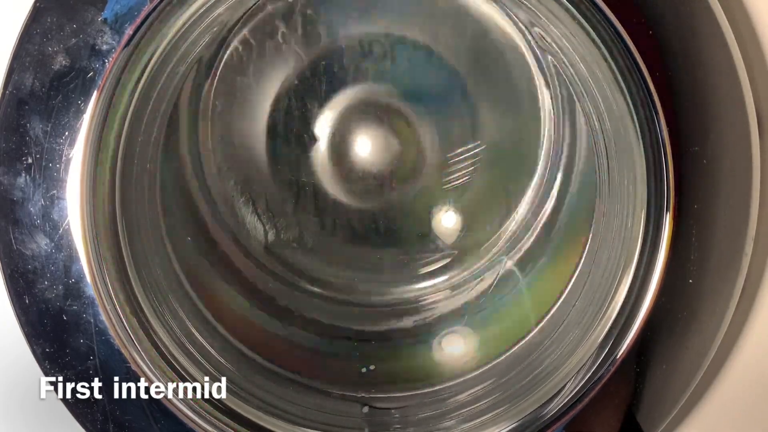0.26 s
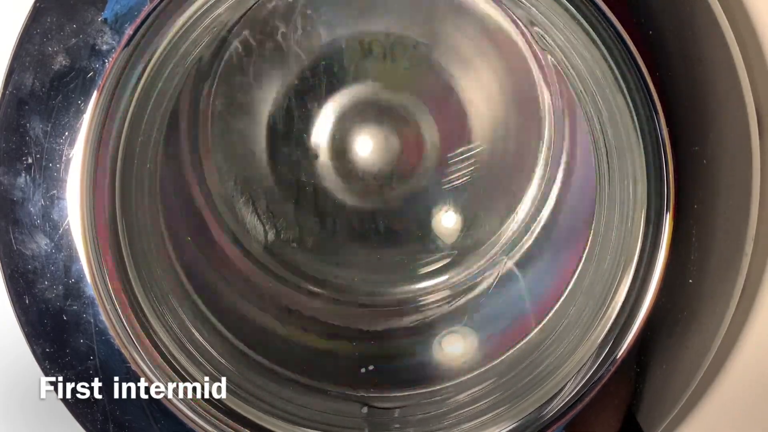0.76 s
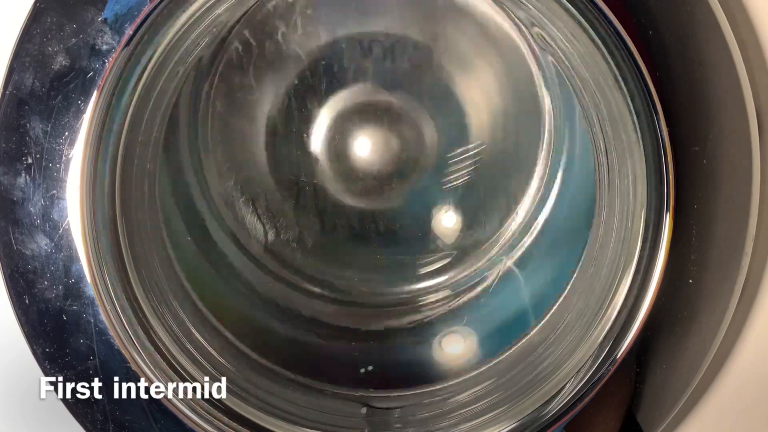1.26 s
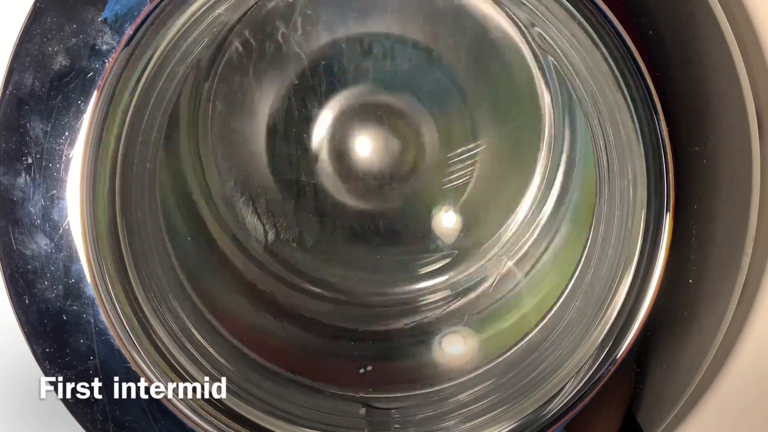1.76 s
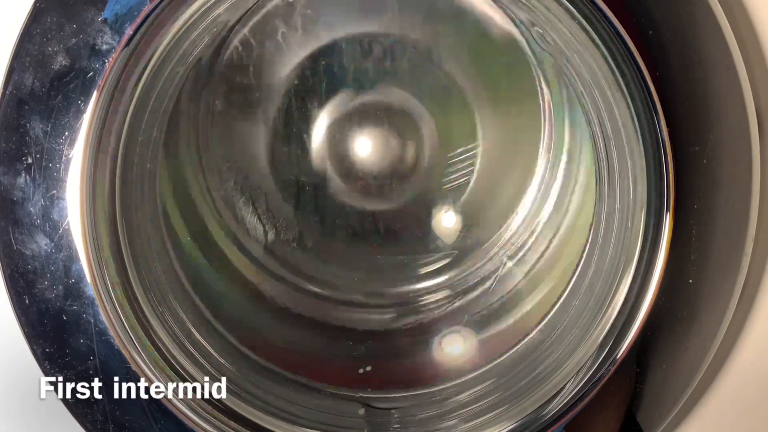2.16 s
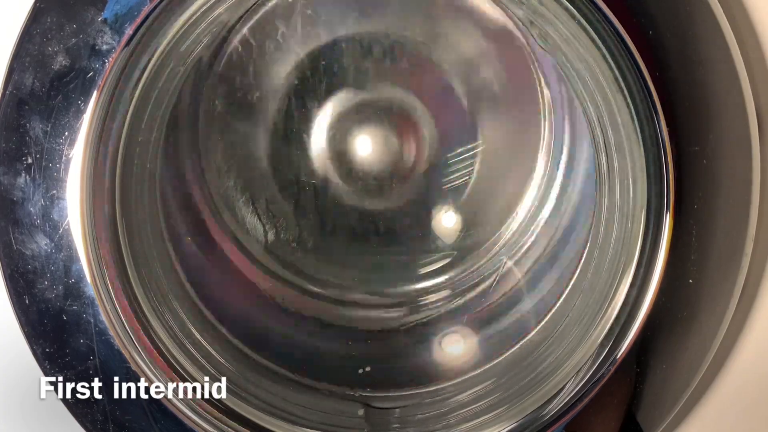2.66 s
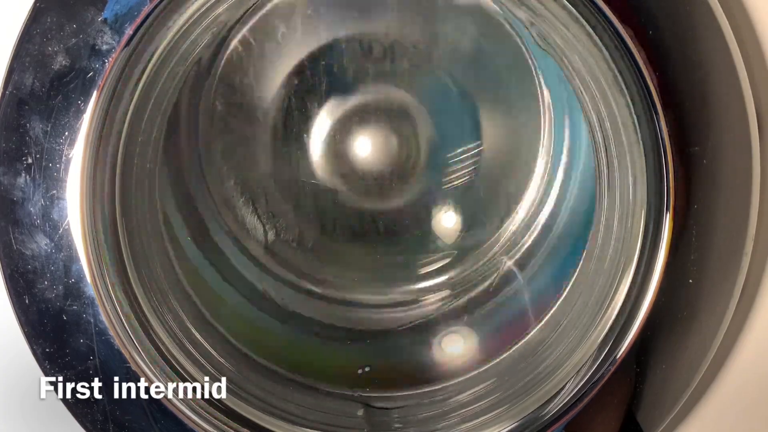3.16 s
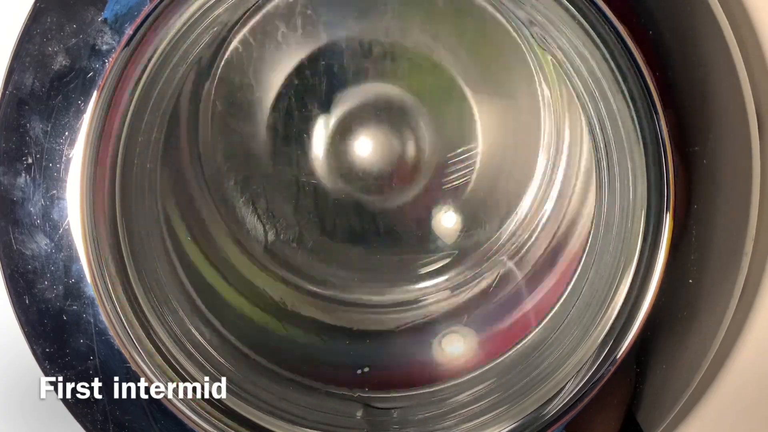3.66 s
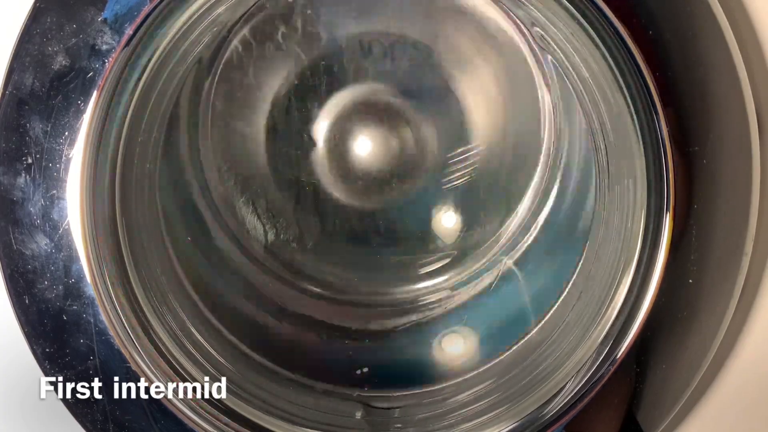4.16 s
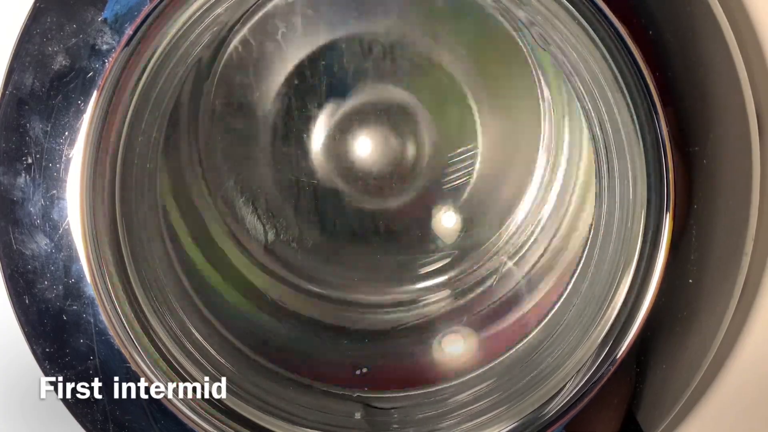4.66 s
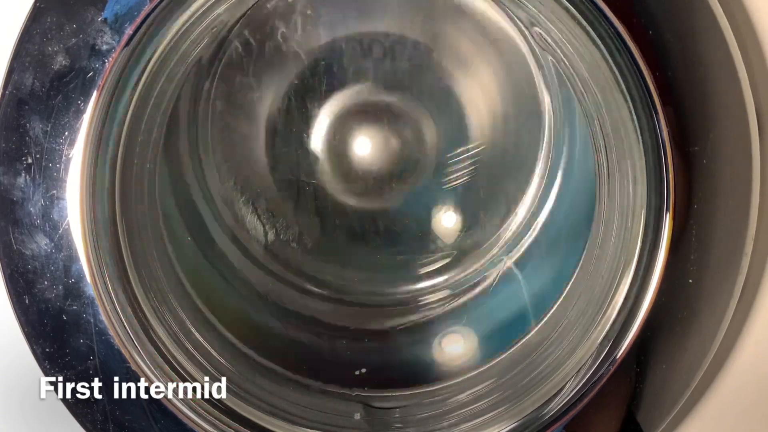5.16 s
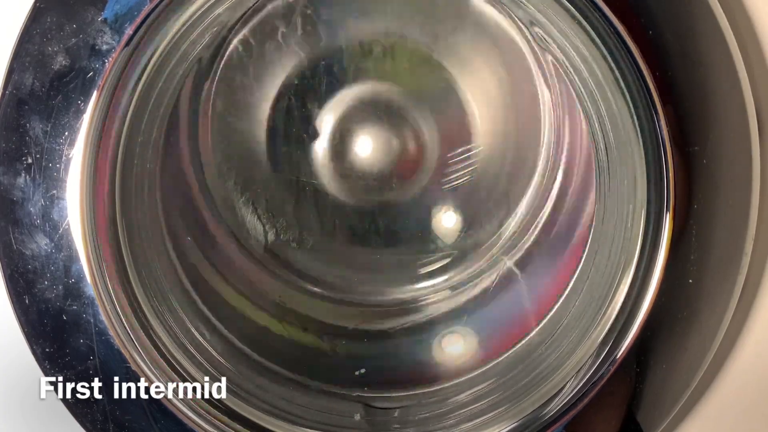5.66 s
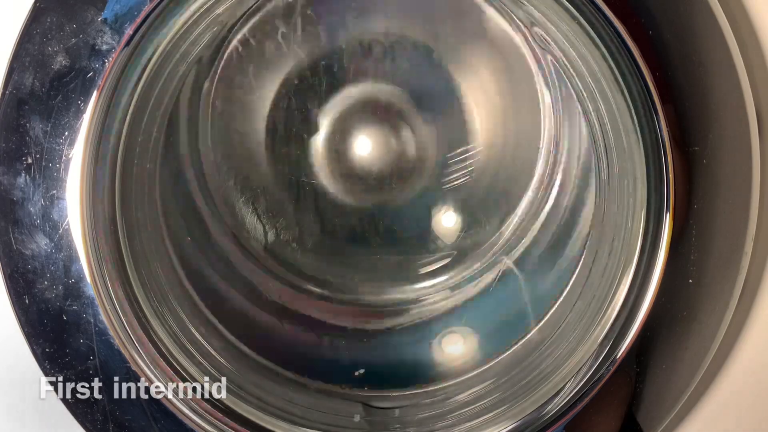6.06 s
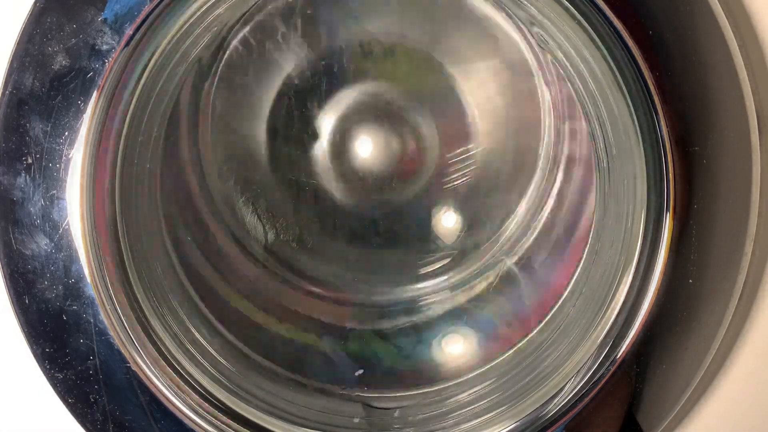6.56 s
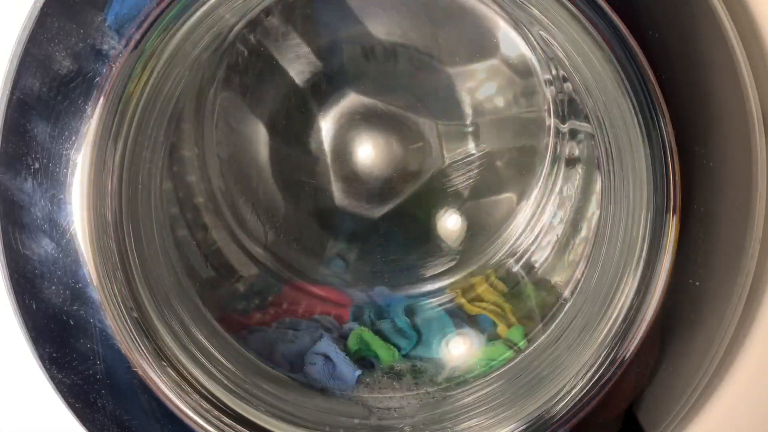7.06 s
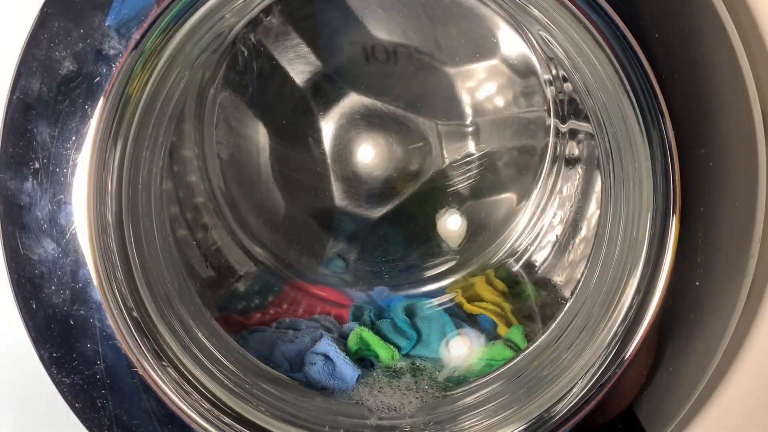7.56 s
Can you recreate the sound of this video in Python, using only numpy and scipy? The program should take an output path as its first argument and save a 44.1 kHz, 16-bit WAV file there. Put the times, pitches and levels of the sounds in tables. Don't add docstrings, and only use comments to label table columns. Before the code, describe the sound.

A washing machine whirls a load of laundry, heard in mono from very near. The sound is already at full spin, dense and continuous, with buzzing hum, fast drum flutter, cabinet rumble, thin high whines and airy hiss. Late on it cross-fades to a resting drum in a quiet indoor room, with tiny faint drips, without any audible slowing down.

```python
import sys
import numpy as np
from scipy import signal
from scipy.fft import rfft, irfft
from scipy.io import wavfile
from scipy.ndimage import uniform_filter1d, map_coordinates

SR = 44100
rng = np.random.default_rng(int(sys.argv[2]) if len(sys.argv) > 2 else 0)


def generate_wav(sig):
    pcm = np.round(np.clip(np.atleast_2d(sig).T, -1, 1) * 32767).astype(np.int16)
    wavfile.write(sys.argv[1], SR, pcm)


def elevation(decibels):
    levels = np.asarray(decibels, float)
    return 10 ** (levels / 20)


N = 343980
TIME = np.arange(N) / SR
SLOW = TIME[::64]
PULLEY = 0.094005


def unit(x):
    return x / np.sqrt(np.mean(x ** 2) + 1e-20)


def wobble(rate_hz):
    return map_coordinates(rng.standard_normal(400), [SLOW * rate_hz])


def smooth(slow):
    return np.interp(TIME, SLOW, slow + 0 * SLOW)


def tone(turns, level_db):
    phase = 2 * np.pi * (turns - np.rint(turns) + rng.random())
    return np.sqrt(2) * smooth(elevation(level_db)) * np.sin(phase.astype(np.float32))


def rush(points, rings=(), patchy_db=1):
    hz, _, z = signal.stft(rng.standard_normal(N + 4096), SR, nperseg=2048)
    patches = uniform_filter1d(rng.standard_normal(z.shape), size=14, axis=0)
    patches = uniform_filter1d(patches, size=4, axis=1)
    f, level = np.transpose(points)
    db = np.interp(np.log(hz + 1), np.log(f), level, left=-120, right=-120)
    for center_hz, width_hz, gain_db in rings:
        db = db + gain_db / (1 + (2 * (hz - center_hz) / width_hz) ** 2)
    shaped = z * elevation(db[:, None] + patchy_db * unit(patches))
    return unit(signal.istft(shaped, SR, nperseg=2048)[1][:N])


def shaft_speed(t_s):
    # start [turns/s], growth per s, per s^2, per s^3
    speed_law = [182.371, 2.7843, -.97143, .06244]
    return np.polyval(speed_law[::-1], t_s)


def shaft_turns():
    return np.cumsum(shaft_speed(TIME)) / SR


def tug(turns):
    return turns + 0.0012 * np.sin(2 * np.pi * PULLEY * turns)


def rocking_db(order, turns):
    drum_angle = 2 * np.pi * PULLEY * turns[::64]
    return 0.035 * order * np.sin(drum_angle + 2 * np.pi * rng.random())


def modes_db(hz, modes):
    response = sum(elevation(db) / (1 + 2j * (hz - center_hz) / width_hz) for center_hz, width_hz, db in modes)
    return 20 * np.log10(abs(response))


def crowded_db(hz):
    spacing_hz = 45
    place = 8 + (hz - hz.min()) / spacing_hz
    real = map_coordinates(rng.standard_normal(64), [place])
    imag = map_coordinates(rng.standard_normal(64), [place])
    return 20 * np.log10(unit(np.hypot(real, imag)) + 0.03)


def unbalance(turns):
    top_speed, loss_db = 184, 0.07
    level_db = -28 - loss_db * (shaft_speed(SLOW) - top_speed) ** 2
    return tone(tug(turns), level_db + 0.52 * wobble(9))


def resonant_orders(turns):
    # shaft_multiple, level_db
    slots = [(18, -55)]
    lone = [(14, -59.5), (25, -66), (53, -78)]
    bars = [(32, -70), (33, -73), (34, -65), (35, -53), (36, -56), (37, -59), (38, -70), (39, -68),
            (40, -66.5)]
    bars_twice = [(66, -83), (67, -89.2), (68, -82), (69, -91.5), (70, -92.5), (71, -83.5), (72, -86),
                  (73, -92.5)]
    # center_hz, width_hz, gain_db
    stator = [(3000, 4, -0.5), (3205, 72, -12.5), (3279, 63, -0.5), (3332.6, 6.3, 11)]
    casing = [(2553, 10, 1), (2490, 60, -4), (4530, 35, 0), (4440, 60, -3), (4605, 20, -6), (9765, 50, 0),
              (9415, 70, -1), (9580, 60, -9)]
    motor_frame = [(5764, 7, -5.5), (5905, 14, 5.5), (6054, 58, 11), (6108, 15, 9.5), (6170, 22, 1.5),
                   (6210, 19, -6), (6255, 42, 4), (6316, 30, 0), (6354, 19, 3.5), (6396, 12, 1),
                   (6464, 7, -3),
                   (6520, 70, -7.5), (6556, 23, 1.5), (6607, 11, 3), (6626, 7, 1), (6712, 70, 0),
                  (6768, 7, -5.5), (6823, 32, 6), (6871, 8, -5), (7005, 9, 2.5), (7062, 120, 1),
                  (7160, 33, 1), (7319, 120, -3.5)]
    brush_holders = [(11781, 44, -8), (12195, 30, 4.5), (12355, 32, -3.5), (12508, 66, 8), (12672, 98, 4),
                     (12855, 64, -9), (13054, 75, -4.0), (13310, 298, -2.8)]
    # orders, modes, unsteadiness_db
    groups = [(slots, stator, 1.1), (lone, casing, 1.5),
              (bars, motor_frame, 1.8), (bars_twice, brush_holders, 2.5)]
    tugged, speed = tug(turns), shaft_speed(SLOW)
    out = np.zeros(N)
    for orders, modes, loose_db in groups:
        for k, db in orders:
            level_db = db + modes_db(k * speed, modes) + rocking_db(k, turns) + loose_db * wobble(7)
            out += tone(k * tugged, level_db)
    return out


def weak_orders(turns):
    # shaft_multiple, early_db, late_db
    shaft_orders = [(2, -56, -49), (3, -53, -57), (4, -53, -54.5), (5, -53, -66.5), (6, -58.5, -69),
                    (7, -53.5, -53), (8, -54, -55), (9, -59, -55), (10, -66, -60), (12, -78, -70),
                    (13, -77, -68.5), (15, -72, -75), (16, -77, -79), (17, -76.5, -81), (19, -68, -75),
                    (20, -73, -75.5), (21, -82, -68), (22, -82.5, -85.5), (23, -83, -77.5),
                    (24, -74.5, -81), (26, -84, -73), (27, -80, -71), (28, -70, -72), (29, -78.5, -75),
                    (30, -78.5, -83), (31, -75.5, -70)]
    tugged = tug(turns)
    out = np.zeros(N)
    for k, *ends_db in shaft_orders:
        slide_db = 1.5 - 2.3 * wobble(2.9) ** 2 + 1.6 * wobble(8)
        level_db = np.interp(SLOW, [2, 5.5], ends_db) + rocking_db(k, turns) + slide_db
        out += tone(k * tugged, level_db)
    return out


def faint_orders(turns):
    # shaft_multiple, level_db
    faint = [(41, -74), (42, -75), (43, -73), (44, -74), (45, -77), (46, -78), (47, -76), (48, -81),
             (49, -89), (50, -85), (51, -93), (52, -87), (54, -93), (55, -91), (56, -88), (57, -96),
             (58, -93), (59, -97), (60, -90), (61, -87), (62, -93), (63, -97), (64, -100), (65, -97),
             (74, -93), (75, -93), (76, -91), (77, -91), (78, -95), (79, -101), (80, -98), (81, -92),
               (82, -97), (83, -100), (84, -102)]
    tugged, speed = tug(turns), shaft_speed(SLOW)
    return sum(tone(k * tugged, db + 1.5 * rocking_db(k, turns) + crowded_db(k * speed))
               for k, db in faint)


def motor(turns):
    return unbalance(turns) + resonant_orders(turns) + weak_orders(turns) + faint_orders(turns)


def drum(turns):
    # drum_multiple, early_db, late_db
    drum_orders = [(3, -50, -55), (4, -47, -51.5), (5, -42, -41), (6, -44.5, -49.5), (7, -48.5, -45),
                   (9, -43.5, -44.5), (11, -47.5, -54), (12, -50.5, -58), (14, -56, -81), (15, -52.5, -67),
                   (18, -61, -53), (23, -64.5, -69), (24, -55, -55), (30, -58.5, -68.5), (33, -58.5, -62.5),
                   (36, -58, -54), (39, -62.5, -63), (48, -61, -59), (51, -59, -59.5)]
    return sum(tone(k * PULLEY * turns, np.interp(SLOW, [2, 5], ends_db) + 2.0 * wobble(1.95))
               for k, *ends_db in drum_orders)


def belt(turns):
    # belt_multiple, level_db
    flap = [(1, -51), (2, -54.5), (3, -62), (4, -65.5)]
    belt_ratio = 0.418
    return sum(tone(k * belt_ratio * turns, db + 0.92 * wobble(9.3)) for k, db in flap)


def pump():
    # hum_multiple, level_db, unsteadiness_db, growth_db_per_s
    hum_orders = [(1, -31, 0.5, 0), (2, -41, 0.5, 0.29), (3, -52, 3.5, 0.65), (4, -53, 1.2, 0.98),
                  (5, -62, 3, 0), (6, -52, 3, 0), (7, -63, 2, 0.5), (8, -55, 1, 0), (10, -59, 1, 0)]
    hum_hz = 100.05
    return sum(tone(k * hum_hz * TIME, db + grow_db * SLOW + loose_db * wobble(3.525))
               for k, db, loose_db, grow_db in hum_orders)


def cabinet():
    # freq_hz, density_db_per_hz
    panels = [(30, -44), (45, -27), (60, -8.5), (140, -0.5), (250, -3.5), (370, -7.5), (440, -12.5),
              (560, -8), (680, -10), (900, -7), (1080, -13.5), (1400, -8.5), (1650, -13.5), (1900, -29)]
    return smooth(elevation(-37.5 + 0.39 * wobble(2.6))) * rush(panels, patchy_db=0.37)


def cooling_air():
    # freq_hz, density_db_per_hz
    air = [(1500, -3), (1900, -0.5), (2600, -4), (3000, -5.5), (4000, -8.5), (5500, -15), (6300, -10),
           (7500, -15), (8600, -21.5), (9600, -34.5)]
    # center_hz, width_hz, gain_db
    shell = [(3133, 51, 13.5), (2660, 120, 3.5)]
    return smooth(elevation(-50 + 0.29 * wobble(2.2))) * rush(air, shell, patchy_db=0.82)


def sparks(turns):
    # freq_hz, density_db_per_hz
    hiss = [(8000, -7.5), (9200, -1), (10000, -5.5), (11600, -7), (12500, -4), (13100, -5.5),
            (14200, -11.5), (15800, -13)]
    chop = 1 + 0.25 * np.cos(2 * np.pi * turns) + 0.2 * np.cos(6 * np.pi * turns)
    return smooth(elevation(-73.5 + 1.6 * wobble(3.5))) * chop * rush(hiss, patchy_db=0)


def quiet_room():
    # freq_hz, density_db_per_hz
    room_tone = [(18, -40.5), (30, -8.5), (53, 3), (152, -1), (443, -11), (532, -4.5), (655, -7.5),
                 (897, -5), (1470, -16), (1960, -32.5), (3060, -30.5), (11600, -37), (15500, -38)]
    humps = [(960, 360, 4), (1490, 200, 3)]  # center_hz, width_hz, gain_db
    return smooth(elevation(-59.5 + 2.1 * wobble(6.9))) * rush(room_tone, humps, patchy_db=1.2)


def trickle():
    # peak_s, center_hz, band_hz, length_s, level_db
    puffs = [
        (7.31, 3120, 30, .008, -76),
        (7.355, 3120, 30, .012, -78),
        (7.39, 3120, 30, .015, -77),
        (7.465, 6400, 900, .035, -79),
        (7.465, 8350, 60, .02, -84),
        (7.485, 3100, 40, .008, -81),
        (7.545, 3120, 30, .025, -85),
        (7.575, 2950, 150, .015, -85),
        (7.57, 4900, 150, .016, -91),
        (7.668, 3100, 40, .01, -84),
    ]
    out = np.zeros(N + SR)
    t = np.arange(-4096, 4096) / SR
    f = np.fft.rfftfreq(len(t), 1 / SR)
    for peak_s, center_hz, band_hz, length_s, level_db in puffs:
        bell = np.exp(-(t / length_s) ** 2)
        band = np.exp(-((f - center_hz) / band_hz) ** 2)
        puff = bell * irfft(rfft(rng.standard_normal(len(t))) * band)
        puff *= np.linalg.norm(bell) / np.linalg.norm(puff)
        first = round((peak_s + t[0]) * SR)
        out[first:][:len(t)] += elevation(level_db) * puff
    return out[:N]


def scene():
    turns = shaft_turns()
    spin = motor(turns) + drum(turns) + belt(turns) + pump() + cabinet() + cooling_air() + sparks(turns)
    fade_start_s, fade_end_s = 6.4, 7.43
    left = np.clip((fade_end_s - TIME) / (fade_end_s - fade_start_s), 0, 1)
    return (left * spin + (1 - left) * quiet_room() + trickle())[None]


def top_cut(x):
    return signal.sosfilt(signal.butter(12, 15760, fs=SR, output="sos"), x)


def record(dry):
    opening = np.minimum(TIME / 0.001, 1)
    return top_cut(dry * opening)


dry = scene()
out = record(dry)
generate_wav(out)
```